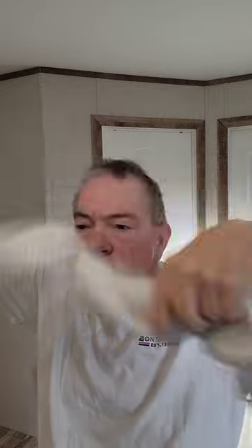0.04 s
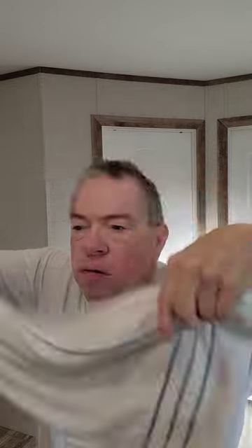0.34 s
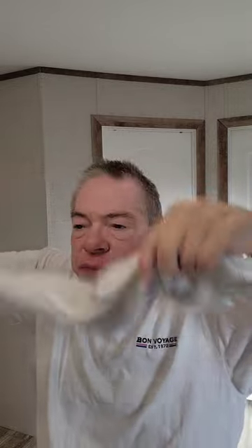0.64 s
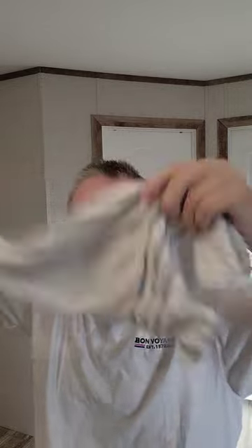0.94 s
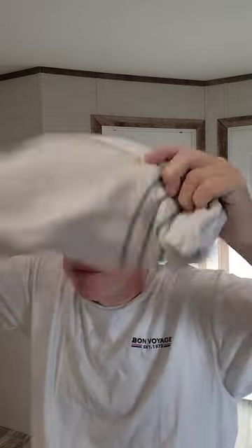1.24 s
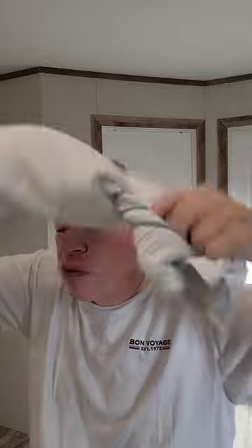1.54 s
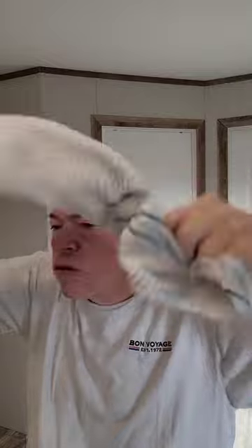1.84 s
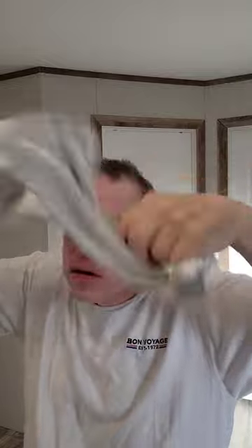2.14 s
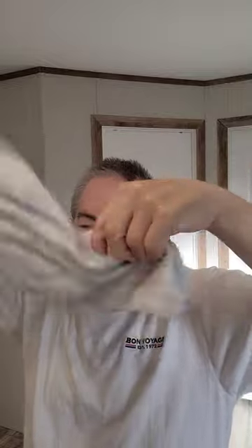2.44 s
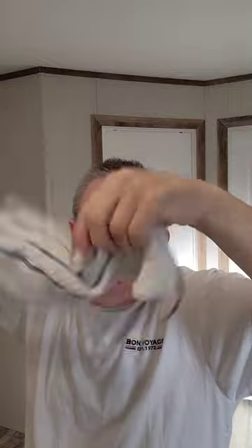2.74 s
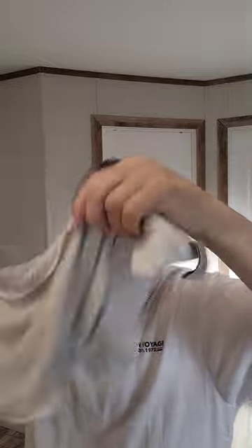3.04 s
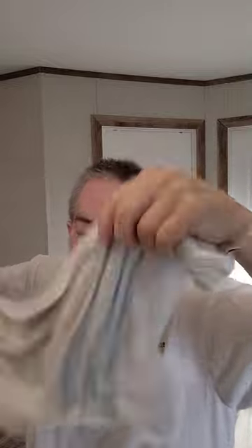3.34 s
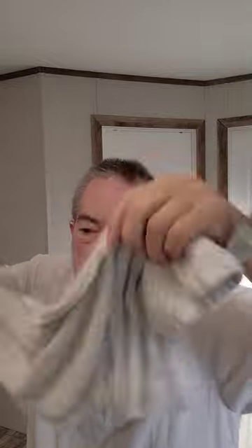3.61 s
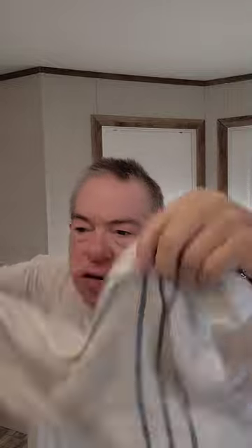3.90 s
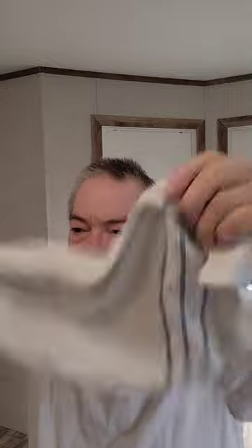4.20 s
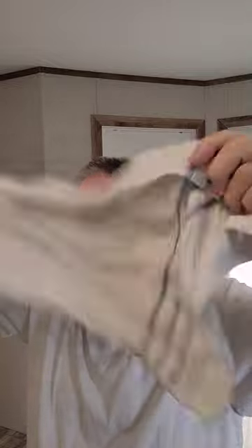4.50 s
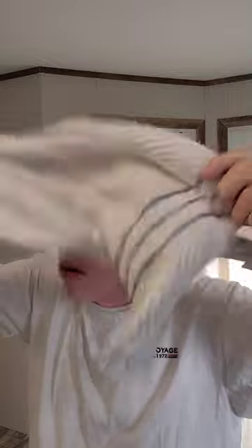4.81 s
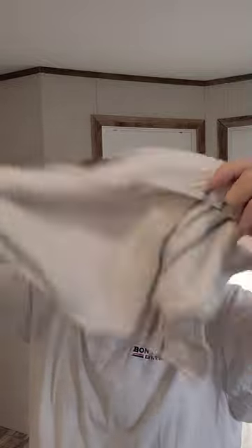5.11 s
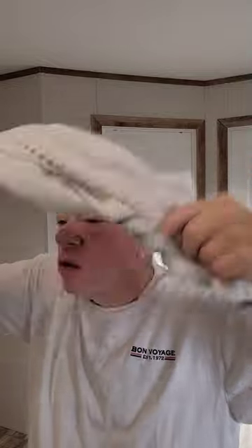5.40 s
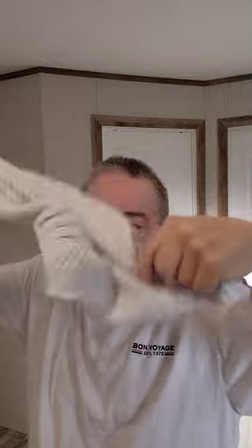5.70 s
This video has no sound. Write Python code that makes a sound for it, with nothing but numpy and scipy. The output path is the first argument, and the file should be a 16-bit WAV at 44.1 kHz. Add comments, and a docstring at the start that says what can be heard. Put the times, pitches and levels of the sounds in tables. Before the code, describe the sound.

A towel swings briskly back and forth over a face and head, making rapid, uneven soft thuds and flaps in a small room.

```python
"""Towel swung over a head

Held by both ends, a towel swings to and fro over a face and head in a small, quiet room.
Each swing pushes out soft puffs of air and ends in a dull thud as the cloth pulls taut.
Folds flap and slide, the pile brushes skin and hair, and now and then a hem flicks or snaps.
Some flicks and thuds are followed by a quick, softer slap off the room."""
import sys
import numpy as np
from scipy import signal
from scipy.fft import rfft, irfft, next_fast_len
from scipy.io import wavfile
from scipy.ndimage import uniform_filter1d

SR = 44100
rng = np.random.default_rng(int(sys.argv[2]) if len(sys.argv) > 2 else 0)


def persist_wave(psi):
    """Save psi, clipped to +-1, as 16-bit WAV."""
    counts = np.round(np.clip(psi, -1, 1) * 32767).astype(np.int16)
    wavfile.write(sys.argv[1], SR, np.atleast_2d(counts).T)


N = 253660

# Cue sheets; their levels are relative, ahead of the mix trims and the room.
# Swings, about 3.6 a second: full_speed_s, rise_s, hold_s, air_db, flap_db, folds_db, pile_db
SWINGS = [(0.005,0.03,0.023,-49,-45.5,-64,-63.5), (0.368,0.028,0.033,-40.5,-46.5,-62,-62.5),
          (0.609,.03,.04,-53.5,-52.5,-72,-67), (0.894,0.028,0.034,-41,-44.5,-69,-65),
          (1.143,.03,0.046,-36.5,-41.5,-64.5,-56), (1.417,0.02,0.022,-34,-39,-62,-63.5),
          (1.682,0.026,0.023,-35,-39,-59.5,-61.5), (1.968,0.021,0.033,-38.5,-36,-59,-62),
          (2.223,0.051,0.04,-43,-43.5,-60.5,-55), (2.506,0.011,0.022,-35.5,-39.5,-60.5,-61.5),
          (2.785,0.028,0.02,-42,-41.5,-58,-58), (3.035,0.0058,0.0052,-36,-41.5,-64,-63),
          (3.333,0.02,0.024,-37.5,-39.5,-64,-67), (3.604,0.018,0.023,-40,-48,-61,-60.5),
          (3.899,.035,0.006,-38.5,-41.5,-63,-61.5), (4.17,.022,0.03,-39,-43.5,-56,-62.5),
          (4.436,0.021,0.062,-41.5,-37,-57,-62), (4.709,0.031,0.017,-39,-44.5,-59.5,-58.5),
          (4.988,0.028,0.022,-41,-47,-61,-59.5), (5.27,.04,0.016,-41,-43,-67,-63.5),
          (5.539,.012,0.025,-41,-44,-57.5,-60)]
# Softer strokes as the towel draws back and settles: full_speed_s, hold_s, air_db, rub_db
RETURNS = [(0.097,0.056,-45.5,-64), (0.249,0.012,-44,-81), (0.284,0.01,-44.5,-64), (0.511,0.035,-45.5,-69),
           (0.78,0.034,-49.5,-70), (1.07,0.032,-40,-75), (1.327,0.0067,-38.5,-61), (1.585,.025,-40.5,-64.5),
           (1.879,0.032,-43.5,-68), (2.066,0.093,-47,-75), (2.402,0.065,-48.5,-68), (2.61,0.017,-43,-74),
           (2.686,.015,-44,-78), (2.846,0.0078,-43.5,-68), (2.925,0.057,-43,-74), (3.141,.11,-48,-85),
           (3.47,0.016,-44,-65.5), (3.735,0.016,-54,-74), (3.856,0.025,-47,-73.5), (4.032,0.024,-48,-69.5),
           (4.263,.035,-48.5,-69.5), (4.606,0.036,-46,-74), (4.807,0.043,-49.5,-75), (5.136,0.076,-50,-76),
           (5.41,0.0063,-48.5,-76), (5.625,0.04,-48,-75), (5.735,.02,-50.5,-73)]
# Dull thuds and soft, bassy puffs of air, some followed by a quick, softer slap off the room:
# time_s, level_db, half_width_ms, push_db (the slower push of air, relative to the pulse)
THUDS_AND_PUFFS = [(0.014,-32.5,0.16,-7.5), (0.111,-31.5,0.54,-12), (0.295,-38.5,0.96,-30),
                   (0.368,-27.5,0.69,-4.5), (0.394,-33.5,0.36,-10), (0.751,-34.5,0.96,-4),
                   (0.765,-38,0.27,0), (0.891,-30,0.55,-4.5), (0.926,-24.5,0.95,-27), (1.056,-42,0.92,-13),
                   (1.06,-26,1.5,-10), (1.288,-32,0.98,-19), (1.337,-30,0.74,-26), (1.424,-25.5,0.44,-34),
                   (1.431,-19.5,0.89,-18), (1.448,-16.5,1.8,-19), (1.679,-28,0.56,-7), (1.704,-18,0.58,-10),
                   (1.724,-25,1.45,-12), (1.989,-16.5,2.8,-21), (2.003,-22,0.36,-3), (2.152,-40.5,4.6,2),
                   (2.242,-30,0.27,-3.5), (2.522,-24,0.67,-9), (2.534,-34,0.41,-14), (2.618,-28.5,1.7,-32),
                   (2.792,-28.5,0.57,-7.5), (2.925,-34,0.87,-6), (3.045,-29.5,0.27,-1.5),
                   (3.337,-24,0.31,-15), (3.366,-30.5,0.31,-2), (3.606,-21.5,.6,-8), (3.886,-34.5,0.94,6),
                   (3.905,-23,0.61,-5.5), (4.161,-23,0.6,-11), (4.166,-19,0.64,-30), (4.177,-20.5,0.21,-30),
                   (4.222,-29,0.53,-21), (4.261,-27.5,0.58,-18), (4.451,-19.5,.4,-34),
                   (4.525,-23.5,0.24,-6.5), (4.712,-22,0.84,-38), (4.761,-23,0.62,-27),
                   (5.008,-31.5,0.19,-5.5), (5.117,-30,1.4,-5.5), (5.288,-36,3.6,4.5), (5.413,-47,1.8,6.5),
                   (5.544,-23,0.48,-21)]
# Flicks, some followed by a quick, softer slap off the room:
# start_s, level_db, left_over_right_db, bright_edge_hz
FLICKS = [(0.562,-45.5,-2,6000), (1.1221,-34.5,2.5,8100), (1.707,-58,-7,1800), (1.994,-61,3,1800),
          (2.1993,-24.5,-0.5,8700), (2.411,-47,5.5,4520), (2.804,-45.5,1,2430),
          (2.986,-47.5,-3,1700), (3.468,-55.5,0,4000), (4.055,-56.5,-4.5,1600),
          (4.443,-54,2,1690), (5.543,-48.5,5,1910), (5.563,-53,0,3000)]

# Rumble and hiss of the still room: freq_hz, gain_db
ROOM_TONE_EQ = [(30, 10), (130, 11.5), (400, 0.5), (900, -14.5), (2300, -53), (4500, -31), (7000, -19.5),
                (11000, -23), (16000, -30)]
# Bassy puffs of air: freq_hz, gain_db
BILLOW_EQ = [(20, -24), (32, 1), (48, 5), (75, 8), (100, -2.5), (130, 14), (175, 0.5), (230, -5.5),
             (400, -48.5)]
# Low-mid flapping: freq_hz, gain_db
FLUTTER_EQ = [(100, -23), (180, -5), (240, 3), (300, 0), (400, -2), (520, -9), (650, -22), (820, -34.5),
              (1400, -68)]
# Midrange rustle of folds: freq_hz, gain_db
FOLDS_EQ = [(400, -16), (700, 7.5), (1000, 2.5), (1300, 2.5), (1750, 0), (2150, -11.5), (3200, -20),
            (6000, -30)]
# Airy hiss of the pile: freq_hz, gain_db
PILE_EQ = [(1200, 1.5), (2200, -2), (2900, 1), (4500, 1), (7000, 4.5), (11000, -4), (15500, -3)]

# How alike left and right are in the room: freq_hz, correlation
STEREO_LIKENESS = [(60, 0.64), (220, 0.74), (400, 0.27), (600, 0.02), (1400, 0), (4000, -.2), (15000, 0)]
# Slaps off walls and ceiling: delay_ms, gain
ECHOES = [(13.4, 0.031), (15.9, 0.31), (24.4, 0.094)]
# Standing waves: pitch_hz, width_hz, gain
ROOM_MODES = [(132.1, 18, 0.43), (234.7, 35, 0.57), (290, 28, 0.45), (478, 5.7, 0.18), (531, 6.4, 0.41),
              (705, 13, 0.4)]
# Tone of the diffuse reverb tail: freq_hz, gain_db
TAIL_EQ = [(40, -5), (150, -16.5), (300, -14.5), (550, 0.5), (1500, 3), (7000, -6), (15000, 1.5)]
# Colour of the microphone ports: freq_hz, gain_db
MICROPHONE_EQ = [(5800, 0.5), (6600, 1), (7400, -2), (8200, -6.5), (9600, -0.5), (11200, 1.5), (12200, -4)]

ROOM_T60_S, RETURN_RISE_S = 0.42, 0.064


def from_db(db):
    """Decibels to gain."""
    return 10 ** (np.asarray(db) / 20)


def unit_power(x):
    """Scale to an RMS of one."""
    return x / np.sqrt(np.mean(x ** 2) + 1e-20)


def curve(points, size):
    """Read a table along a log-frequency axis, at each bin of an FFT of this size."""
    hz = np.arange(size // 2 + 1) * SR / size
    knots_hz, values = np.transpose(points)
    return np.interp(np.log(hz + 1e-9), np.log(knots_hz), values)


def equalise(x, eq):
    """Shape a sound with an EQ curve."""
    size = next_fast_len(x.shape[-1] + SR // 4)
    return irfft(rfft(x, size) * from_db(curve(eq, size)), size)[..., :x.shape[-1]]


def cut(x, hz, kind, order=2):
    """Butterworth low- or high-pass."""
    return signal.sosfilt(signal.butter(order, hz, kind, fs=SR, output="sos"), x + 1e-18)


def wide_noise(size):
    """Stereo noise, near the centre in the bass and wide in the treble."""
    likeness = curve(STEREO_LIKENESS, size)
    mid = rfft(rng.standard_normal(size)) * np.sqrt((1 + likeness) / 2)
    side = rfft(rng.standard_normal(size)) * np.sqrt((1 - likeness) / 2)
    return irfft(np.array([mid + side, mid - side]), size)


def room_response():
    """Direct sound, a few echoes and a diffuse tail, all feeding the standing waves."""
    t = np.arange(SR // 2) / SR
    early = np.zeros(len(t))
    early[0] = 1
    for delay_ms, gain in ECHOES:
        early[int(delay_ms * SR / 1000)] += gain
    build_up = np.clip((t - 0.003) / 0.0063, 0, 1)
    decay = build_up * from_db(-60 * t / ROOM_T60_S)
    tail = equalise(wide_noise(len(t)), TAIL_EQ) * decay / np.sqrt(np.sum(decay ** 2))
    arriving = early + tail
    ringing = sum(gain * signal.lfilter(*signal.iirpeak(hz, hz / width_hz, fs=SR), arriving)
                  for hz, width_hz, gain in ROOM_MODES)
    return arriving + ringing


def in_room(x, room):
    """A source as it arrives at the two microphones."""
    return signal.fftconvolve(np.atleast_2d(x), room, axes=-1)[:, :N]


def cloth_texture(room, eq, slips_per_s, scatter_db, steady_s, haze_db):
    """Small slips and puffs over a haze of finer ones, levelled so that only the fast grain stays."""
    sizes = from_db(scatter_db * np.minimum(rng.exponential(1, N), 4)) * rng.choice([-1, 1], N)
    slips = unit_power(sizes * (rng.random(N) < slips_per_s / SR))
    texture = equalise(in_room(slips, room) + from_db(haze_db) * wide_noise(N), eq)
    span = int(steady_s * SR)
    power = np.mean(texture ** 2, axis=0)
    slow_power = uniform_filter1d(uniform_filter1d(power, span), span)
    return texture / np.sqrt(slow_power + np.mean(slow_power) / 100)


def stroke(full_speed_s, rise_s, hold_s, fall_db_per_s):
    """Envelope of one stroke: the cloth gathers speed, slides, then comes to rest."""
    t = np.arange(N) / SR - full_speed_s
    attack = np.clip(t / rise_s + 1, 0, 1) ** 2
    return attack * from_db(-fall_db_per_s * np.clip(t - hold_s, 0, 1))


def motion(layer, falls_db_per_s, lag_s, idle_db):
    """One layer's envelope through all swings and returns; the towel is never quite still."""
    swing_fall, return_fall = falls_db_per_s
    power = from_db(idle_db) ** 2
    for time_s, rise_s, hold_s, air_db, flap_db, folds_db, pile_db in SWINGS:
        level_db = dict(air=air_db, flap=flap_db, folds=folds_db, pile=pile_db)[layer]
        power += (from_db(level_db) * stroke(time_s + lag_s, rise_s, hold_s, swing_fall)) ** 2
    for time_s, hold_s, air_db, rub_db in RETURNS:
        level_db = dict(air=air_db, flap=air_db - 6, folds=rub_db - 5, pile=rub_db)[layer]
        power += (from_db(level_db) * stroke(time_s + lag_s, RETURN_RISE_S, hold_s, return_fall)) ** 2
    return np.sqrt(power)


def room_tone():
    """A steady bed of low rumble with a trace of hiss."""
    return unit_power(equalise(wide_noise(N), ROOM_TONE_EQ))


def billow(room):
    """The moving towel shoves the air aside in soft, bassy puffs."""
    puffs = cloth_texture(room, BILLOW_EQ, slips_per_s=170, scatter_db=1.5, steady_s=0.037, haze_db=1.5)
    return puffs * motion("air", falls_db_per_s=(234, 263), lag_s=0.0032, idle_db=-59.5)


def flutter(room):
    """Loose cloth flaps with a lumpy, low-mid ruffle."""
    flaps = cloth_texture(room, FLUTTER_EQ, slips_per_s=290, scatter_db=4.5, steady_s=0.04, haze_db=-8)
    return flaps * motion("flap", falls_db_per_s=(233, 206), lag_s=0.0011, idle_db=-63)


def sliding_folds(room):
    """Folds slide over each other with a grainy rustle."""
    rustle = cloth_texture(room, FOLDS_EQ, slips_per_s=400, scatter_db=5.5, steady_s=0.082, haze_db=1.5)
    return rustle * motion("folds", falls_db_per_s=(216, 170), lag_s=0.00091, idle_db=-84.5)


def brushing_pile(room):
    """The pile brushes skin and hair; countless tiny slips blur into hiss."""
    hiss = cloth_texture(room, PILE_EQ, slips_per_s=9900, scatter_db=2.5, steady_s=0.037, haze_db=9)
    return hiss * motion("pile", falls_db_per_s=(203, 155), lag_s=0.00053, idle_db=-77.5)


def thuds_and_puffs(room, low_hz=40.5, top_hz=587, push_ms=2.96):
    """Each thud or puff is one smooth pressure pulse riding on a push and pull of air."""
    pressure, t = np.zeros(N), np.arange(N) / SR
    for time_s, level_db, half_width_ms, push_db in THUDS_AND_PUFFS:
        skew = rng.uniform(-1, 1)  # tilts the pulse and picks its polarity
        near = np.abs(t - time_s) < 0.03
        ms = (t[near] - time_s) * 1000
        pulse_t, push_t = ms / max(half_width_ms, 0.2), ms / push_ms
        pulse = (1 + skew * pulse_t / 2) / (1 + pulse_t ** 2) * np.exp(-(pulse_t / 8) ** 2)
        push = from_db(push_db) * push_t * np.exp((1 - push_t ** 2) / 2)
        pressure[near] += from_db(level_db) * np.sign(skew) * (pulse - push)
    return in_room(cut(cut(pressure, low_hz, "high"), top_hz, "low", order=6), room)


def hem_flicks(room, low_hz=935, fade_s=0.0045, fibres_db=-23.5, right_lag_ms=0.1):
    """A hem whipping over: a sharp crack and a brief spray of fibres."""
    track, t = np.zeros((2, N)), np.arange(SR // 20) / SR
    for start_s, level_db, pan_db, edge_hz in FLICKS:
        flick = from_db(fibres_db) * rng.standard_normal((2, len(t))) * np.exp(-t / fade_s)
        flick[0, 0] += 1  # the crack reaches the left microphone first
        flick[1, int(right_lag_ms * SR / 1000)] += 1
        flick = cut(cut(flick, low_hz, "high"), edge_hz, "low", order=4)
        pan = from_db([[pan_db / 2], [-pan_db / 2]])
        start = int(start_s * SR)
        track[:, start:start + len(t)] += from_db(level_db) * pan * flick / np.abs(flick).max()
    return in_room(track, room)


def scene():
    """The mix: air, folds and thuds a touch to the right, bright pile and flicks on top, room tone below."""
    room = room_response()
    air = from_db(-1.5) * (billow(room) + flutter(room))
    folds = sliding_folds(room)
    pile = from_db(-2.76) * brushing_pile(room)
    thuds = from_db(-0.62) * thuds_and_puffs(room)
    flicks = from_db(2.1) * hem_flicks(room)
    bed = from_db(-59) * room_tone()
    pan_right = from_db([[-0.6], [0.6]])
    return (air + folds + thuds) * pan_right + pile + flicks + bed


def record(dry):
    """The microphone ports colour the treble; the deepest rumble and the very top are cut."""
    body = cut(equalise(dry, MICROPHONE_EQ), hz=33, kind="high")
    top_cut = signal.ellip(12, 0.1, 80, 15650, fs=SR, output="sos")
    return signal.sosfilt(top_cut, body)


dry = scene()
out = record(dry)
persist_wave(out)
```